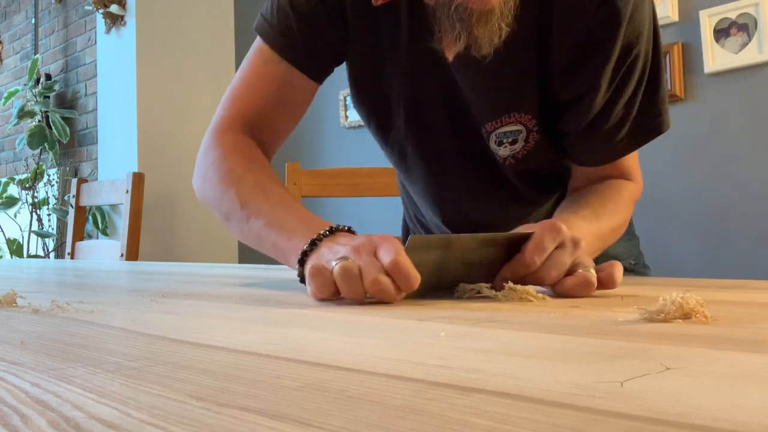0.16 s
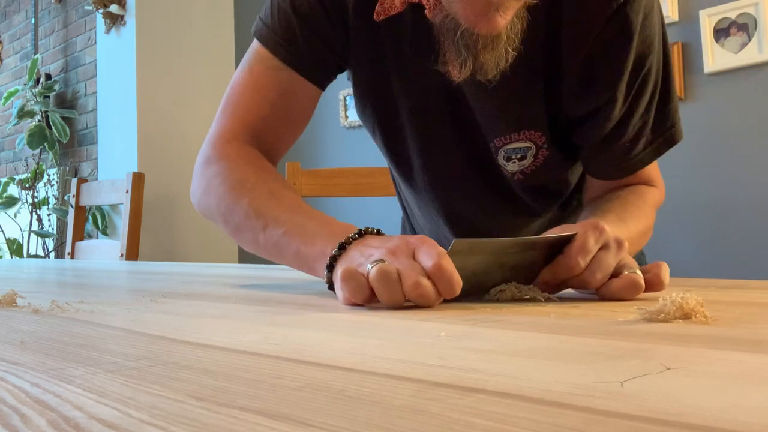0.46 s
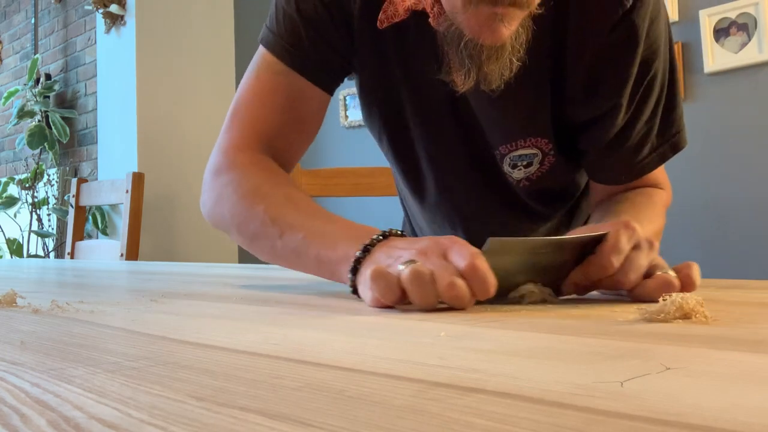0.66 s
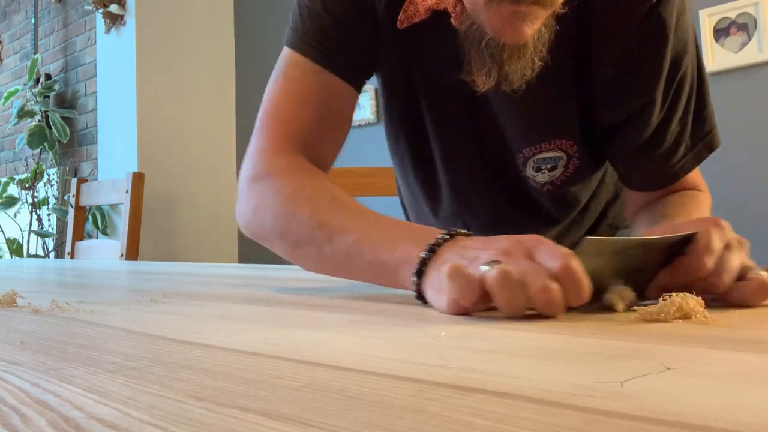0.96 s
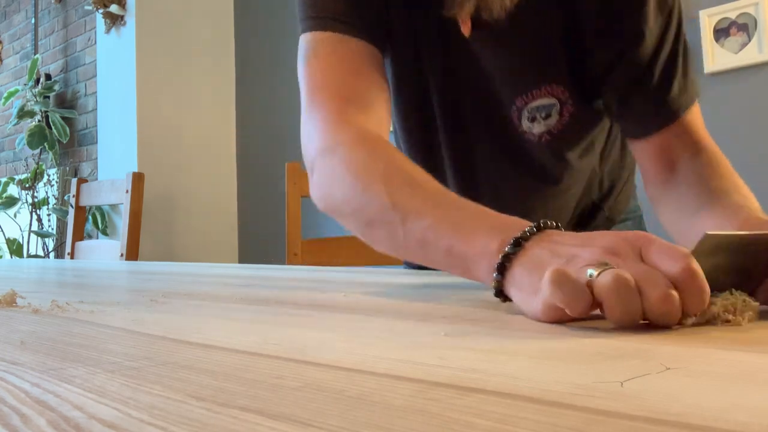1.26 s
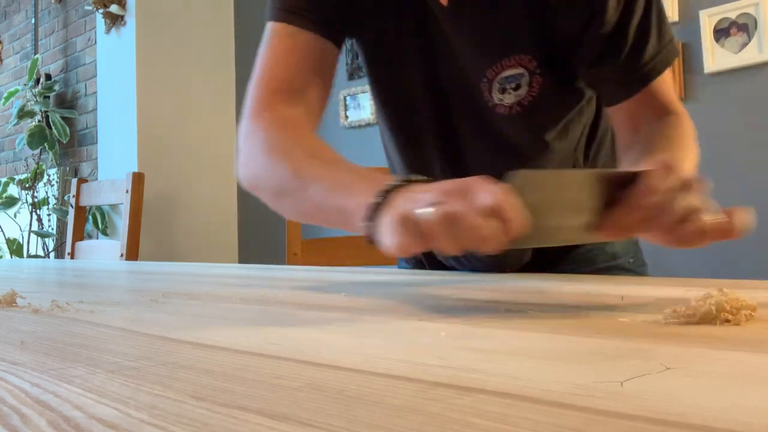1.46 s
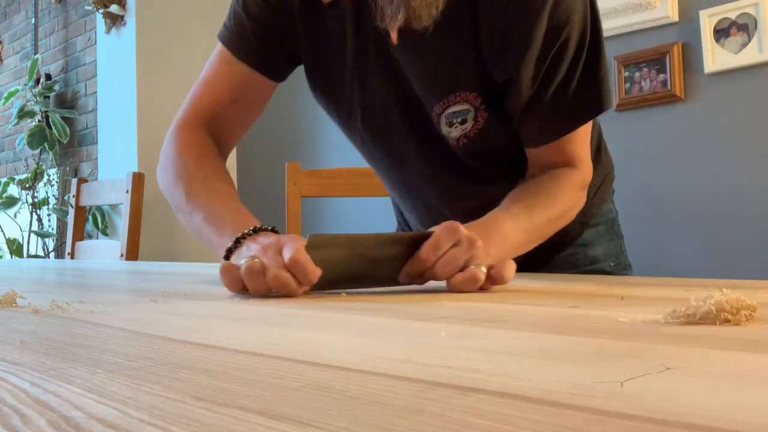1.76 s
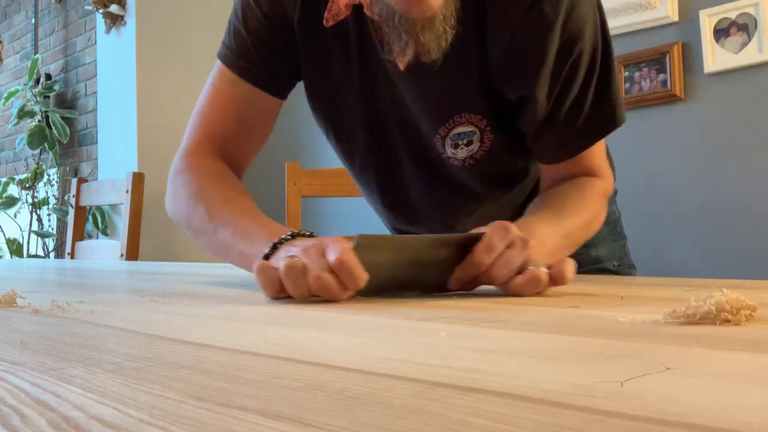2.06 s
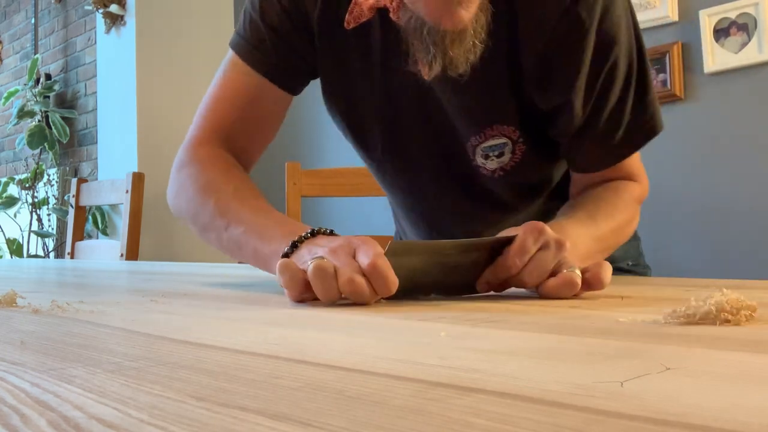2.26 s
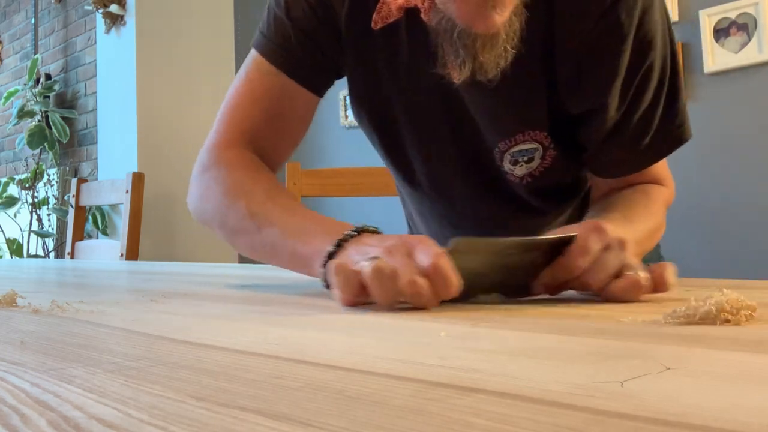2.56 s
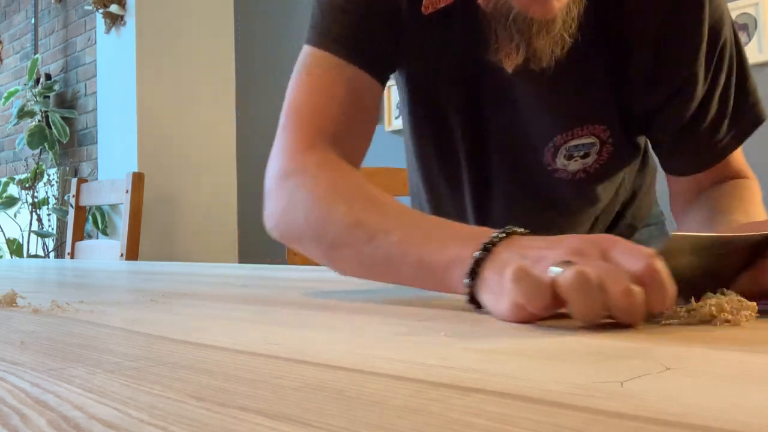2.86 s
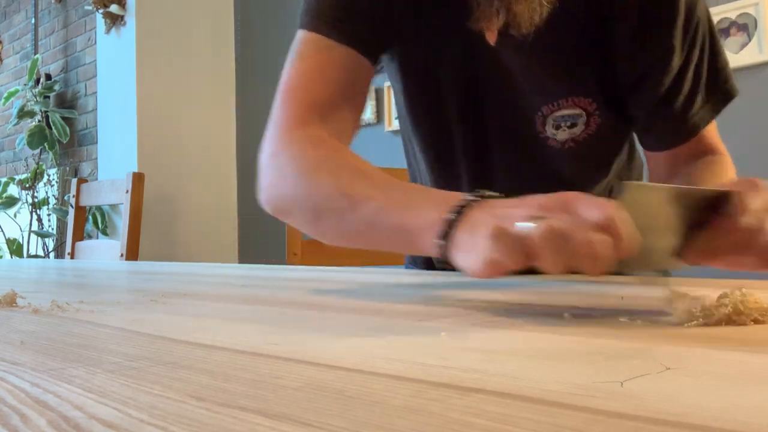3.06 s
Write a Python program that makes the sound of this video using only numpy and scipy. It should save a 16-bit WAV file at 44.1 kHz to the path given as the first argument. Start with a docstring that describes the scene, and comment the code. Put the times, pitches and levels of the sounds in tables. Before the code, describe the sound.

A steel card scraper works a wooden tabletop, close up in a small room with faint air and hum. A soft knock at 0.15 s starts a short raspy stroke; a louder knock at 0.5 leads into a longer hissing one, jolting at 0.95 and ending in harsh chatter around 1.1-1.25. After a gap, strokes run 1.85-2.2 and 2.25-2.95, with table rumble, knocks and jolts at 2.45 and 2.8.

```python
"""Four strokes of a steel card scraper over a wooden tabletop, close to the microphone, in a small room.
Quiet air and a wavering hum lie under it all; a soft knock marks the first stroke, a louder one leads into the second.
Along each stroke snapping fibres hiss and tear in the ringing blade, the grain rasps and the table rumbles.
The second stroke jolts midway and ends in harsh stick-slip chatter; a short gap follows.
Two more strokes each start from a knock, and the last jolts twice more before the edge lifts."""
import sys
import numpy as np
from scipy import signal
from scipy.fft import rfft, irfft
from scipy.io import wavfile
from scipy.ndimage import uniform_filter1d, map_coordinates

SR = 44100
rng = np.random.default_rng(int(sys.argv[2]) if len(sys.argv) > 2 else 0)


def pcm_store(signal):
    """Save signal as 16-bit PCM."""
    levels = np.round(np.clip(np.atleast_2d(signal), -1, 1) * 32767)
    wavfile.write(sys.argv[1], SR, levels.astype(np.int16).T)


N = 141120
TIME = np.arange(N) / SR

# Levels are relative to the layer trims and the room.
# one table per stroke: t/s, hiss level/dB, tearing level/dB, rasp level/dB, rumble level/dB
STROKES = [
    [(0.0, -63, -65.5, -57.5, -59), (0.158, -68.5, -75.5, -84.5, -49), (0.188, -49, -60.5, -46.5, -50),
     (0.226, -48, -57.5, -41.5, -50), (0.282, -43.5, -58, -41.5, -40.5), (0.364, -37.5, -54, -46, -48),
     (0.396, -43, -60, -42, -36.5), (0.464, -66, -77, -99, -51)],
    [(0.54, -50.5, -64, -52, -43), (0.616, -38, -51.5, -46.5, -42.5), (0.708, -44, -64, -46.5, -41),
     (0.776, -37, -47.5, -47.5, -40.5), (0.86, -39.5, -56.5, -48.5, -46.5), (0.974, -36.5, -53.5, -45, -35),
     (1.105, -45, -52.5, -41, -46.5), (1.134, -35.5, -33, -36, -34), (1.154, -32, -68, -39.5, -36),
     (1.226, -29.5, -44, -37, -33.5), (1.27, -38, -56, -53, -37)],
    [(1.87, -52, -59.5, -54, -52), (1.918, -43.5, -60, -62, -51), (1.954, -38, -53, -50, -59),
     (2.018, -38.5, -56, -51.5, -37), (2.052, -35.5, -51.5, -48, -46), (2.088, -34.5, -44, -43, -35),
     (2.13, -33.5, -53, -45, -38), (2.158, -45.5, -67, -49, -45), (2.18, -50, -83, -77, -39)],
    [(2.28, -54.5, -65, -57.5, -40), (2.318, -46, -59.5, -50.5, -33.5), (2.398, -46.5, -59.5, -47, -33),
     (2.492, -45.5, -63, -51, -36.5), (2.524, -35, -47.5, -39.5, -39), (2.636, -29, -48, -47.5, -32.5),
     (2.778, -31, -47, -40.5, -40), (2.836, -37.5, -53.5, -41.5, -51), (2.914, -39, -52, -48, -37),
     (2.97, -55.5, -68, -79, -45.5)],
]
# deep throb of the table, one table per stroke: t/s, level/dB
THROBS = [
    [(0.16, -49.5), (0.44, -44.5), (0.47, -55)],
    [(0.53, -45), (1.204, -41), (1.3, -50)],
    [(1.99, -54), (2.008, -43.5), (2.2, -51)],
    [(2.26, -48), (2.792, -40), (3.0, -49)],
]
# the edge rubs without biting: t/s, length/s, level/dB
RUBS = [(.24, 0.083, -48), (2.32, .19, -35.5)]
# the edge catches and judders: t/s, length/s, level/dB
CHATTERS = [(1.115, 0.035, -14.5), (1.165, 0.04, -28.5), (1.206, 0.026, -20)]
# blade set down or jolting over hard grain: t/s, knock level/dB, edge tick level/dB, tick tilt/(dB per octave)
KNOCKS = [(.155, -42, -66, 0), (.519, -32, -33, -6), (.937, -33, -42, -5), (1.825, -41, -70, -5),
          (2.251, -29, -28, -1), (2.439, -33, -30, -9), (2.797, -30, -40, -5)]
# brighter or duller wood, one value per stroke: rasp tilt/(dB per octave)
RASP_TILTS = [1, 1.5, -1, 0]

# colour of the fine hiss: f/Hz, level/dB
CUT_COLOUR = [(300, -45), (3000, -22), (5500, -8), (7000, -3), (8500, -1), (10000, -.5), (12500, -1),
              (15500, .5)]
# colour of the coarse tearing: f/Hz, level/dB
TEAR_COLOUR = [(300, -50.5), (1100, -14), (1600, 6.5), (2200, 2), (3000, 2), (4200, 3), (5500, -0.5),
               (7500, -10), (15000, -13)]
# colour of the rasp before its tilt: f/Hz, level/dB
RASP_COLOUR = [(150, -25), (400, -10.5), (650, -1), (1080, -3), (1500, -9), (2200, -17), (3200, -21.5),
               (6000, -29.5), (15000, -66)]
# colour of the edge rubbing: f/Hz, level/dB
RUB_COLOUR = [(150, -39), (330, -16.5), (440, 4), (800, -2), (1150, -5), (2000, -25), (8000, -47)]
# colour of the boards' rumble: f/Hz, level/dB
RUMBLE_COLOUR = [(30, -40), (80, -13), (130, -3), (190, -13), (240, -3), (370, -6.5), (460, -14),
                 (900, -14.5), (3000, -48.5)]
# colour of the whole table's throb: f/Hz, level/dB
THROB_COLOUR = [(20, -63), (38, -15), (52, 14), (65, 10.5), (82, -4.5), (130, -10), (400, -79)]
# colour of the chatter: f/Hz, level/dB
JUDDER_COLOUR = [(300, -25), (1700, -14), (2400, -3), (3200, -4), (4200, -1), (5200, -3), (8000, -1),
                 (12000, -3), (15500, -1)]
# colour of the edge tick before its tilt: f/Hz, level/dB
TICK_COLOUR = [(100, -17), (600, 14), (1500, 7), (4000, -12.5), (9000, 8.5), (15000, 14.5)]

# blade resonances: f/Hz, width/Hz, lift/dB
BLADE = [(2250, 200, 3), (2617, 40, 3), (3355, 45, 5), (4050, 500, 4), (5632, 60, 6), (6100, 200, 4),
         (9175, 100, 6), (11280, 200, 6), (13200, 450, 2)]
# extra blade resonances while it chatters: f/Hz, width/Hz, lift/dB
SQUEAL = [(2450, 300, 3), (8020, 400, 8)]
# tabletop resonances: f/Hz, width/Hz, then lift/dB in stroke 1, 2, 3, 4
BOARDS = [(234.4, 38, 7, 7, 9, 11), (293.2, 7.1, 11, 8, 13.5, 10), (375.6, 27, 7, 10.5, 12, 8.9),
          (704, 18, 4, -7, -3.5, 2), (760, 30, 3.5, 1.5, 2, 5.3), (943.4, 25, 6, 9, -2, 7.4),
          (1044.4, 22, 7, 4.5, 11, 8.9), (1193, 42, 7.5, 10.5, -1, 6), (1227, 95, 2, -0.5, 2.5, 0.33),
          (1445, 210, 1.5, 8, -4.5, 9.2), (1845, 240, 5, -1, -2.5, 0), (2190, 450, 2, 4, 10, 6)]
# modes of a knock on the table: f/Hz, level/dB, t60/s
KNOCK_MODES = [(55.4, -7, 0.44), (140, -1, 0.071), (249, -2.5, 0.1), (273, 2.5, 0.019),
               (409.4, -5.5, 0.077), (646, 0, 0.026), (1110, -5.5, 0.017)]

# left-right bearing of the blade: t/s, left port's lead/microseconds
BEARING = [(.2, -11), (.6, 38), (1.0, -8), (1.15, -100), (1.3, -110), (1.85, 85), (2.15, 94), (2.5, 37),
           (2.95, -60)]
# phase between the ports: f/Hz, left port's lead/radians
PORT_PHASE = [(100, 0), (300, .1), (430, 1.4), (550, 3.7), (750, 3.9), (950, 5.3), (1400, 4.5), (2100, 5.9),
              (4000, 6.2), (6000, 5.5), (7500, 3.3), (9200, 3.0), (9800, 2.1), (12000, .1), (13200, -.1),
              (15700, -3.1)]
# balance of the ports: f/Hz, left minus right level/dB
PORT_BALANCE = [(60, -4), (400, -4.5), (600, 1.5), (950, -5), (1400, -1), (2100, 2.5), (2800, 0),
                (4200, 1.2), (8000, 0)]
# decay of the room: f/Hz, t60/s
ROOM = [(60, 1), (300, 0.97), (1000, 0.38), (4000, 0.44), (10000, 0.088), (16000, 0.39)]
# sideways spread of the echoes: f/Hz, level/dB
ECHO_WIDTH = [(80, -4), (300, 0), (1000, 0), (2000, 2), (4000, 1), (7500, -4), (15000, -4)]
# colour of the still air: f/Hz, level/dB
AIR_COLOUR = [(20, -34), (48, 0), (70, -10), (150, -15), (330, -15), (550, -22), (1500, -29), (5000, -40),
              (15000, -60)]
# partials of the hum, nominal pitch and rms: f/Hz, level/dB
HUM = [(49, -59), (101, -57), (301, -62)]

CUT_DB, TEAR_DB, RASP_DB, RUMBLE_DB, THROB_DB = 4.5, 8, 5.5, -1.5, 1  # layer trims
ATTACK_DB_PER_S, RELEASE_DB_PER_S = 330, 688.5
CHATTER_HZ, CHATTER_JITTER, SLIP_S = 185, .3, .0015
THROB_UNEVEN = .4  # larger keeps more of the throb's own swells
TICK_S = .0013  # decay constant of the tick
SPLIT_HZ = 7000  # the moving delay works below this
AIR_DB = -57.5
EDGE_HZ = 15780


def cutting():
    """Fibres snap at the edge and ring the blade: a dense fine hiss under a sparser, coarser tearing."""
    fine = snaps(per_s=11000, spread_db=2.4, clump_db=0.5, clump_hz=290)
    coarse = snaps(per_s=3000, spread_db=3.0, clump_db=2, clump_hz=90)
    hiss = unit(ring(fine, CUT_COLOUR, BLADE))
    tear = flex(ring(coarse, TEAR_COLOUR, BLADE), depth_db=3.5, patch_hz=220, patch_s=.045)
    hiss_gain = amp(CUT_DB) * stroke_gain(STROKES, column=1)
    tear_gain = amp(TEAR_DB) * stroke_gain(STROKES, column=2)
    return hiss_gain * hiss + tear_gain * tear


def flex(x, depth_db, patch_hz, patch_s, size=1024):
    """The blade bends under the thumbs, so its colour wanders in small patches of time and pitch."""
    z = signal.stft(x, nperseg=size)[2]
    field = rng.standard_normal(z.shape)
    spans = (patch_hz * size / SR, patch_s * SR / (size / 2))  # in bins, in frames
    for axis, span in enumerate(spans):
        field = uniform_filter1d(field, max(round(span), 1), axis)
    coloured = z * amp(depth_db * unit(field))
    return unit(signal.istft(coloured, nperseg=size)[1][:N])


def rasping():
    """The edge trips over the grain and rings the tabletop; where it rubs without biting it sounds duller."""
    slips = snaps(per_s=1800, spread_db=-0.5, clump_db=2.5, clump_hz=150)
    rasp = np.zeros(N)
    for index, (stroke, tilt) in enumerate(zip(STROKES, RASP_TILTS)):
        wood = unit(ring(slips, tilted(RASP_COLOUR, tilt), tabletop(index)))
        rasp += stroke_gain([stroke], column=3) * wood
    rub = snaps(per_s=1200, spread_db=3.0, clump_db=2, clump_hz=97.3)
    return amp(RASP_DB) * rasp + arches(RUBS) * unit(ring(rub, RUB_COLOUR))


def tabletop(index):
    """The tabletop's resonances as they speak along the path of one stroke."""
    return [(hz, width, lifts[index]) for hz, width, *lifts in BOARDS]


def rumbling():
    """The dragging force shakes the boards, and the whole table throbs on its legs."""
    drag = snaps(per_s=1500, spread_db=1, clump_db=1.5, clump_hz=60)
    boards = np.zeros(N)
    for index, stroke in enumerate(STROKES):
        boards += stroke_gain([stroke], column=4) * unit(ring(drag, RUMBLE_COLOUR, tabletop(index)))
    frame = signal.hilbert(unit(ring(drag, THROB_COLOUR)))
    throb = unit(frame.real / (abs(frame) + THROB_UNEVEN))  # swells partly levelled
    return amp(RUMBLE_DB) * boards + amp(THROB_DB) * stroke_gain(THROBS, column=1) * throb


def chattering():
    """The edge sticks and slips unevenly; each slip sends a short noise burst into the blade."""
    slip_rate = CHATTER_HZ * (1 + CHATTER_JITTER * drift(210))
    turns = np.cumsum(slip_rate) / SR
    slip = np.exp(-(turns % 1) / (CHATTER_HZ * SLIP_S))
    bursts = (.35 + slip) * rng.standard_normal(N)  # some noise stays between slips
    return arches(CHATTERS) * unit(ring(bursts, JUDDER_COLOUR, BLADE + SQUEAL))


def knocking(rise_s=0.0014):
    """The edge ticks on the wood and the table answers with a dull knock of decaying modes."""
    out, t = np.zeros(N), np.arange(SR // 2) / SR
    modes = sum(amp(db - 60 * t / t60) * np.sin(2 * np.pi * hz * t) for hz, db, t60 in KNOCK_MODES)
    knock = modes * (1 - np.exp(-t / rise_s))
    for s, knock_db, tick_db, tilt in KNOCKS:
        scratch = unit(ring(rng.standard_normal(len(t)), tilted(TICK_COLOUR, tilt), BLADE))
        tick = scratch * np.exp(-t / TICK_S)
        add(out, s, amp(knock_db) * knock + amp(tick_db) * tick)
    return out


def travel(pair):
    """Below the split, the delay between the ports follows the bearing of the blade."""
    low = signal.sosfiltfilt(signal.butter(6, SPLIT_HZ, fs=SR, output="sos"), pair)
    lead = np.interp(TIME, *np.transpose(BEARING)) * 1e-6 * SR / 2  # samples, half for each port
    moved = [map_coordinates(port, [np.arange(N) + sign * lead], order=3)
             for port, sign in zip(low, (1, -1))]
    return pair - low + np.array(moved)


def ports(x):
    """Sound reaches the two microphone ports with different phase and level at each pitch."""
    hz = np.fft.rfftfreq(2 * N, 1 / SR)
    lean = amp(read(PORT_BALANCE, hz) / 2)
    z = rfft(x, 2 * N)
    left = z * lean * np.exp(1j * read(PORT_PHASE, hz))
    return irfft(np.array([left, z / lean]))[:, :N]


def room(x, size=20, delay_s=0.0044):
    """Two sets of sparse reflections, one in every size samples, each band dying at its own speed."""
    count = SR // size
    taps = np.zeros((2, count * size))
    at = np.arange(count) * size + rng.integers(0, size, (2, count))
    np.put_along_axis(taps, at, rng.choice([-1., 1.], at.shape), 1)
    taps *= np.arange(count * size) > delay_s * SR
    hz, t, z = signal.stft(taps, SR, nperseg=256)
    decay = amp(-60 * t / read(ROOM, hz)[:, None])
    tail = signal.istft(z * decay, SR, nperseg=256)[1]
    return signal.fftconvolve(x[None], tail / np.linalg.norm(tail[0]), axes=1)[:, :N]


def background():
    """Quiet room air, partly separate at each port, with a low hum wavering in pitch and level."""
    air = [unit(ring(rng.standard_normal(N), AIR_COLOUR)) for _ in range(3)]
    hum = np.zeros(N)
    for hz, db in HUM:
        waver = 1 + 0.37 * drift(7)
        phase = 2 * np.pi * np.cumsum(hz + drift(4.1)) / SR
        hum += amp(db) * np.sqrt(2) * waver * np.sin(phase)
    return ports(hum + amp(AIR_DB) * air[0]) + .3 * amp(AIR_DB) * np.array(air[1:])


def snaps(per_s, spread_db, clump_db, clump_hz):
    """Tiny fractures at random moments, uneven in size, that swell and thin in clumps."""
    spread = spread_db * np.minimum(rng.exponential(1, N), 4)
    size = amp(spread + clump_db * drift(clump_hz))
    return size * rng.choice([-1., 1.], N) * (rng.random(N) < per_s / SR)


def ring(x, colour, resonances=(), size=16384):
    """Passes x through a causal minimum-phase body with a broad colour and narrow resonances."""
    hz = abs(np.fft.fftfreq(size, 1 / SR))
    lifts = sum(lift / (1 + (2 * (hz - f) / width) ** 2) for f, width, lift in resonances)
    db = read(colour, hz) + lifts
    response = np.fft.ifft(np.exp(np.conj(signal.hilbert(np.log(amp(db)))))).real
    return signal.oaconvolve(x, response[:size // 2])[:len(x)]


def tilted(colour, tilt):
    """Tips a colour by tilt dB per octave; scaling to rms 1 afterwards removes the added level."""
    return [(hz, db + tilt * np.log2(hz)) for hz, db in colour]


def stroke_gain(strokes, column):
    """One level column as a gain; the edge eases in before each stroke and lifts quickly after it."""
    gain = np.zeros(N)
    for stroke in strokes:
        rows = np.array(stroke)
        early = np.maximum(rows[0, 0] - TIME, 0)
        late = np.maximum(TIME - rows[-1, 0], 0)
        level = np.interp(TIME, rows[:, 0], rows[:, column])
        gain += amp(level - ATTACK_DB_PER_S * early - RELEASE_DB_PER_S * late)
    return gain


def arches(events):
    """Gain of short events that swell and die away."""
    gain = np.zeros(N)
    for s, length, db in events:
        progress = np.clip((TIME - s) / length, 0, 1)
        gain += amp(db) * np.sqrt(abs(np.sin(np.pi * progress)))
    return gain


def drift(hz):
    """Smooth random motion of rms 1, fading out for rates above about hz."""
    f = np.fft.rfftfreq(N, 1 / SR)
    return unit(irfft(rfft(rng.standard_normal(N)) * np.exp(-(f / hz) ** 2), N))


def amp(db):
    """Decibels to gain."""
    return 10 ** (np.asarray(db) / 20)


def unit(x):
    """Scales to rms 1."""
    return x / np.sqrt(np.mean(x ** 2) + 1e-20)


def read(points, hz):
    """Reads a table on a log-frequency axis."""
    f, value = np.transpose(points)
    return np.interp(np.log(hz + 1), np.log(f + 1), value)


def add(mix, s, sound):
    """Mixes a sound in at time s."""
    part = mix[max(round(s * SR), 0):][:len(sound)]
    part += sound[:len(part)]


def scene(blade_room_db=-8, wood_room_db=-5, table_room_db=-11):
    """Blade, wood and table, direct and through the room, whose echoes differ from port to port."""
    blade = cutting() + chattering()
    wood = rasping()
    table = rumbling() + knocking()
    send = amp(blade_room_db) * blade + amp(wood_room_db) * wood + amp(table_room_db) * table
    centre, side = room(send)
    left, right = ports(ring(side, ECHO_WIDTH))
    echoes = ports(centre) + np.array([left, -right])  # opposite sign spreads them sideways
    direct = travel(ports(blade + wood + table))
    return direct + echoes / np.sqrt(2) + background()


def record(dry):
    """A steep low-pass limits the band at EDGE_HZ."""
    lowpass = signal.firwin(511, EDGE_HZ, window=("kaiser", 9), fs=SR)
    return signal.oaconvolve(dry, lowpass[None], "same")


dry = scene()
out = record(dry)
pcm_store(out)
```